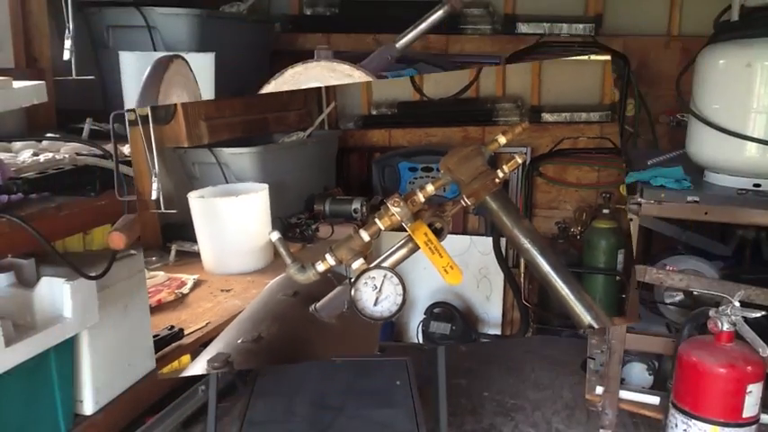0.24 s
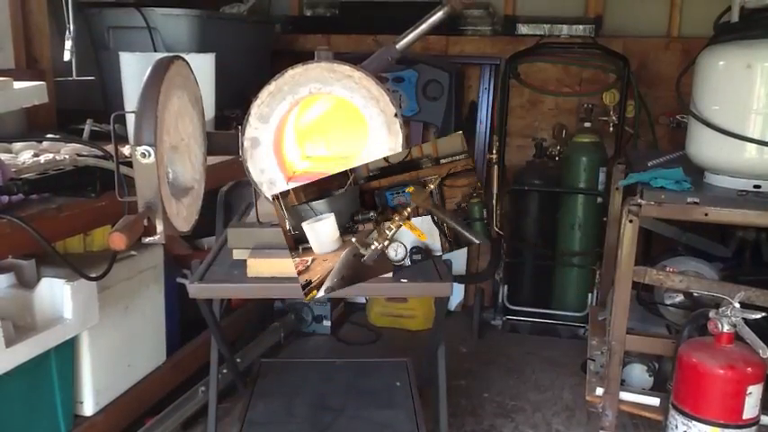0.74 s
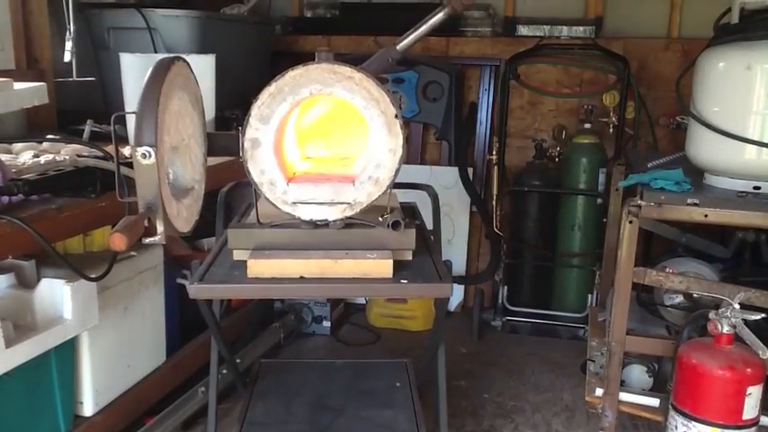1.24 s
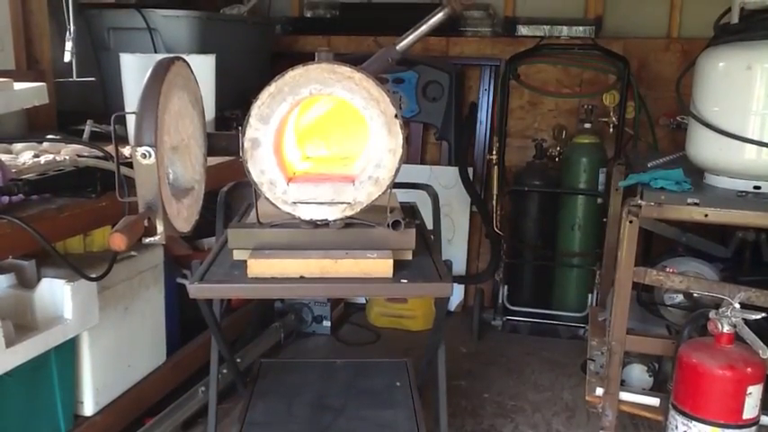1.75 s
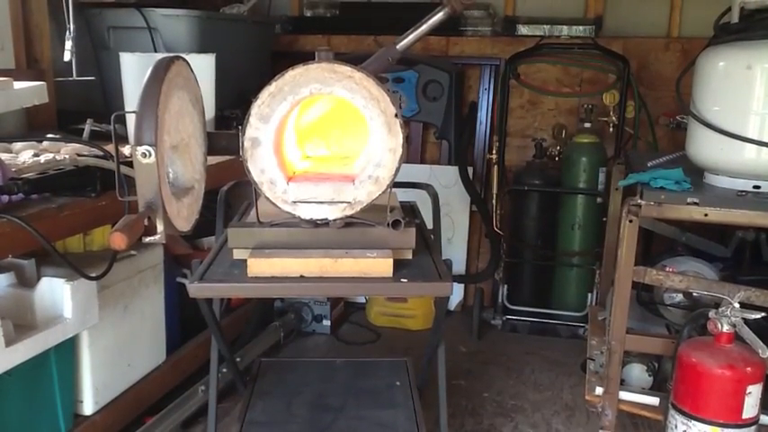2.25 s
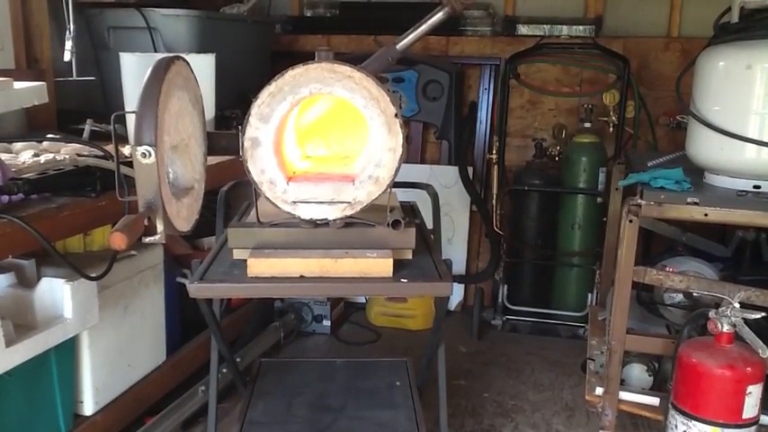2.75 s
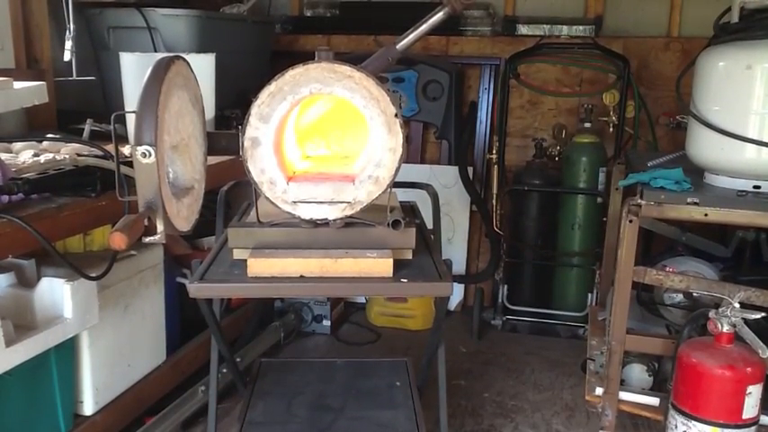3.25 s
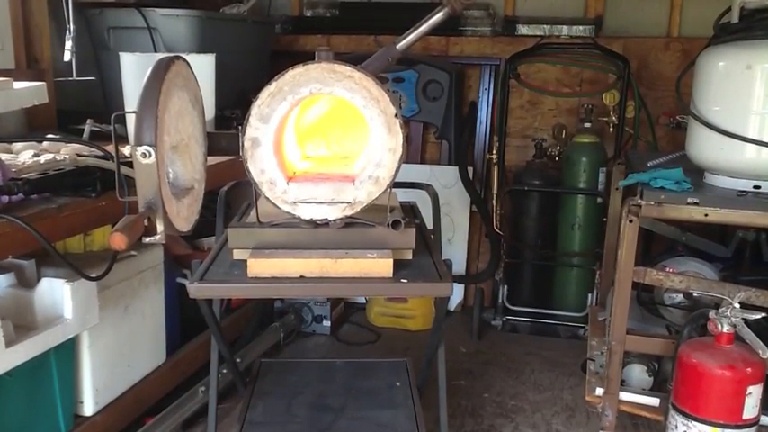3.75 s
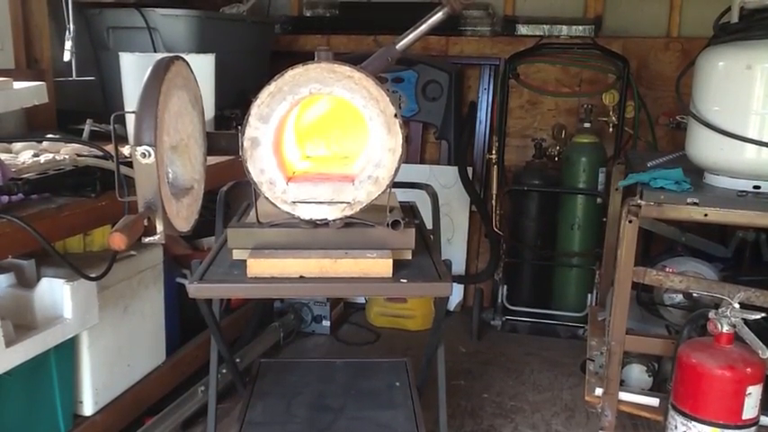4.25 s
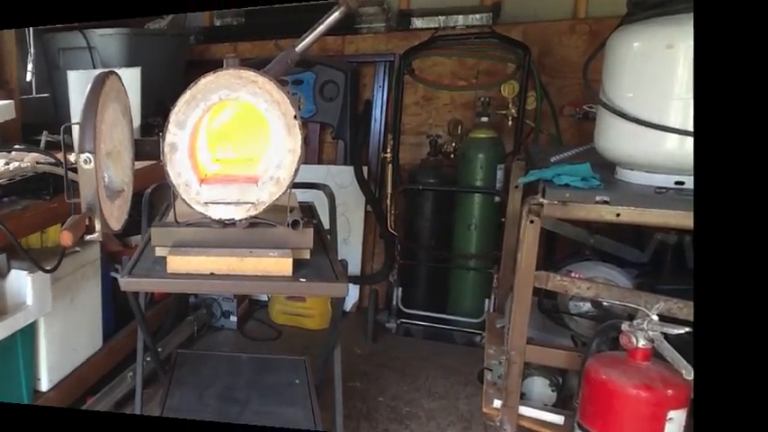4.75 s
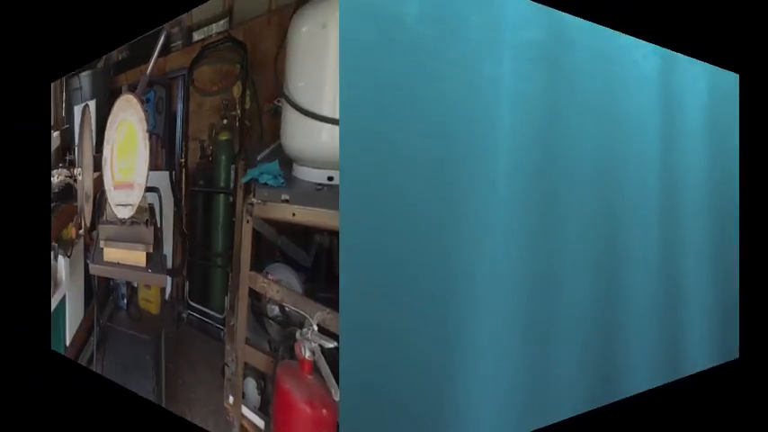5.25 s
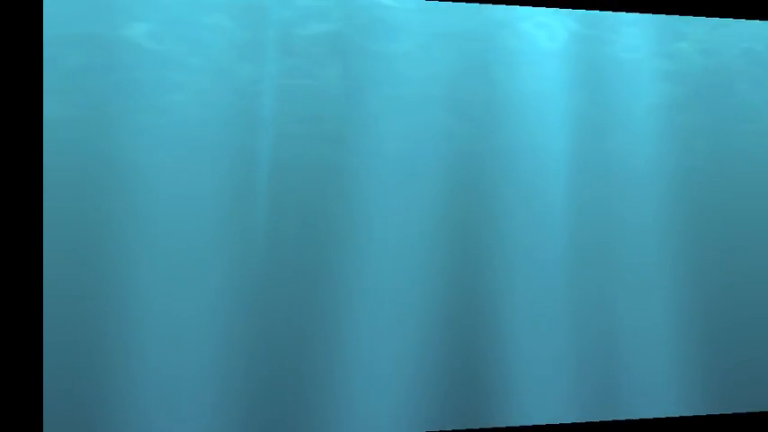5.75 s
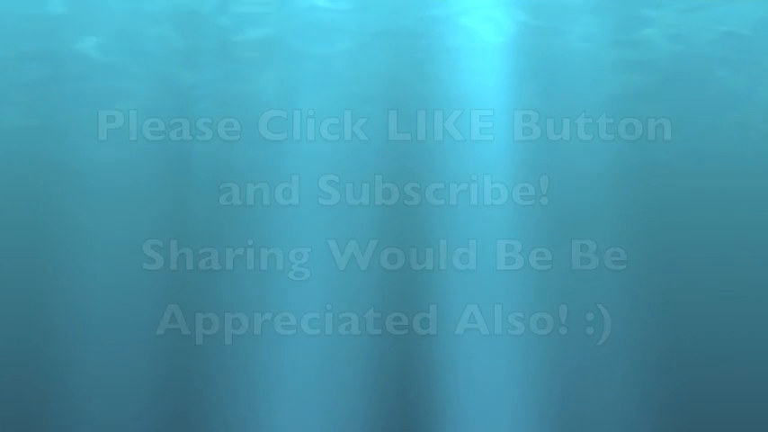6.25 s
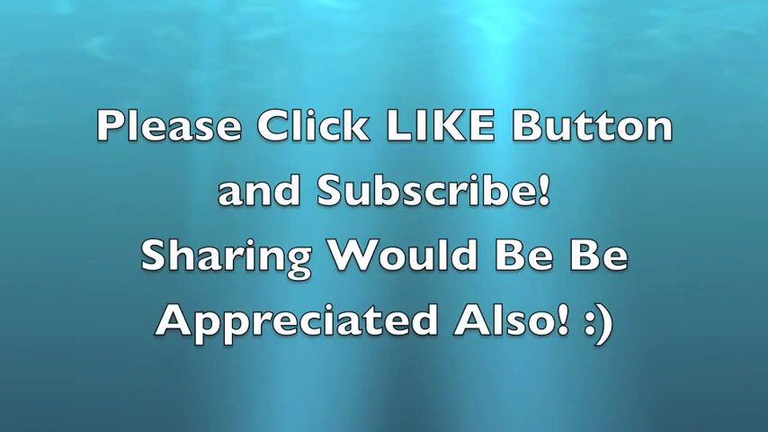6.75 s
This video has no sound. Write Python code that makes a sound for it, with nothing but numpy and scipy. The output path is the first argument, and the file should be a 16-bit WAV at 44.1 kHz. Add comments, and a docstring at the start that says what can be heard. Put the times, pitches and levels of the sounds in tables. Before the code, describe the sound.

Steady forge roar dominated by low and low-mid rushing, coloured by the hollow ring of the chamber and burner tube. Small flame surges ripple through it; faint hiss, high whistles and a few breathy chirps sit far beneath. Soft low booms appear in the second half. The sound rises at the start, stays level, then fades smoothly to nothing in a small, cluttered workshop, heard from nearby.

```python
"""Cluttered workshop: a propane burner roars into an open, glowing forge.
Flame: noise bursts ring chamber and burner-tube resonances; echo nulls hollow out some pitches.
Gas jet: fluttering noise hisses through tube resonances; wavering sines whistle thinly.
Brief whistle flares, breathy chirps and low booms come on top.
The whole sound fades in from a quarter of full gain, holds and fades to silence."""
import sys
import numpy as np
from scipy import signal
from scipy.fft import rfft, irfft, next_fast_len
from scipy.io import wavfile
from scipy.ndimage import uniform_filter1d, map_coordinates

SR = 44100
rng = np.random.default_rng(int(sys.argv[2]) if len(sys.argv) > 2 else 0)


def unload_audio(sound):
    """Save the sound as a 16-bit wav file, at the path given as the first command line argument."""
    columns = np.transpose(np.atleast_2d(sound))
    # keep every value between -1 and 1, then stretch to whole-number steps
    steps = np.round(np.clip(columns, -1, 1) * 32767)
    wavfile.write(sys.argv[1], SR, steps.astype(np.int16))


N = 308680
TIME = np.arange(N) / SR  # s
FREQ = np.maximum(np.arange(N // 2 + 1) * SR / N, 1)  # Hz


def undb(db):
    """Decibels to gain."""
    return 10 ** (np.asarray(db) / 20)


def unit(x):
    """Scale to standard deviation 1."""
    return x / np.std(x)


def slope(points):
    """Broad spectrum in dB, straight on a log-frequency axis."""
    hz, db = np.transpose(points)
    return np.interp(np.log(FREQ), np.log(hz), db)


def bells(table):
    """Resonant lifts or dips in dB; each is half its dB at the edges of its width."""
    return sum(db / (1 + ((FREQ - hz) / (width_hz / 2)) ** 2) for hz, width_hz, db in table)


def ring(x, response_db):
    """Minimum-phase filter: resonances ring after each push; rms 1."""
    cepstrum = irfft(response_db * np.log(10) / 20, N)
    # fold onto positive time to make the filter causal
    cepstrum[1:N // 2] *= 2
    cepstrum[N // 2 + 1:] = 0
    response = np.exp(rfft(cepstrum))
    return unit(irfft(rfft(x) * response, N))


def band(hz, half_width_hz):
    """Noise around one frequency, 6 dB down at the half width; rms 1."""
    size = next_fast_len(N, real=True)
    freq = np.arange(size // 2 + 1) * SR / size
    gain = 1 / (1 + ((freq - hz) / half_width_hz) ** 2)
    noise = rfft(rng.standard_normal(size))
    return unit(irfft(noise * gain, size)[:N])


def walk(rate_hz):
    """Smooth random wandering up to about rate_hz; spread 1."""
    return band(0, rate_hz)


def ramp(start_s, end_s):
    """Straight rise from 0 to 1 between two times."""
    return np.clip((TIME - start_s) / (end_s - start_s), 0, 1)


def swell(centre_s, half_s):
    """Gaussian rise and fall; top 1, half_s is its standard deviation."""
    return np.exp(-.5 * ((TIME - centre_s) / half_s) ** 2)


def curve(points):
    """Control that runs straight between (time_s, value) points."""
    return np.interp(TIME, *np.transpose(points))


def tone(hz, waver_hz, waver_rate_hz):
    """Self-sustained oscillation whose pitch wavers; rms 1."""
    pitch_hz = hz + waver_hz * walk(waver_rate_hz)
    return np.sqrt(2) * np.sin(2 * np.pi * np.cumsum(pitch_hz) / SR)


EVENING, EVENING_S = .45, .06  # share of each swell (in dB) taken back; averaging time


def steady(x):
    """The steady gas supply evens out slow swells and lulls; rms 1."""
    power = uniform_filter1d(x ** 2, int(EVENING_S * SR))
    return unit(x / power ** (EVENING / 2))


# broad colour of combustion noise: pitch_hz, level_db
FLAME_COLOUR = [(30, -58), (60, -57), (78, -34), (100, -19), (150, -8), (230, -4.5), (340, -6), (460, -8.5),
                (660, -18), (780, -27), (1050, -36.5), (1350, -54), (3000, -68.5)]
# resonances of chamber, burner tube and bench: pitch_hz, width_hz, lift_db
CHAMBER_MODES = [(104, 18, 4), (173.2, 28, 5.5), (247.8, 23, 6), (326.4, 20.6, 9), (355.6, 17.2, 7.5),
                 (443, 18, 2.5), (542, 15, 6), (619, 56, 5.5), (671.7, 30, 6), (736, 24, 5),
                 (860.6, 24, 8.5), (1043, 21, 9), (1120, 30, 9.5)]
# floor and wall echoes cancel the direct sound: pitch_hz, width_hz, dip_db
ECHO_NULLS = [(135, 12.6, -7.5), (192.3, 8.5, -19), (380.1, 19.4, -13), (510.6, 29.7, -12.5),
              (591, 7.9, -5), (639.4, 23.2, -14), (729, 25.7, -12)]
# flame surges with a short thud: centre_s, lift_db
FLAME_SURGES = [(.095, 4), (.39, 3), (.82, 4), (1.18, 4), (1.281, 3.5), (1.991, 3), (2.35, 1.5),
                (2.93, 3.5), (3.08, 4.5), (4.07, 5), (4.19, 3), (4.315, 2), (4.665, 2.5), (4.865, 0),
                (5.89, 2)]
# roar below 400 Hz: time_s, gain_db
BODY_GAIN = [(0, 1.4), (1.3, 1.1), (1.9, .3), (2.6, -0.5), (3.1, 0.95), (4.3, 0), (5.3, 1)]
# roar above 400 Hz: time_s, gain_db
UPPER_GAIN = [(0, 1.2), (.3, -0.3), (.7, 1), (1, -0.5), (1.3, 1), (1.9, 2.5), (3.5, 2.5), (4.2, 0.4),
              (4.6, 3), (5.1, 3), (5.4, 0.5), (5.65, 1.8)]
ROAR_DB, SPLIT_HZ, SURGE_HALF_S = -23, 400, 0.0064
SETTLE_FROM_S, SETTLED_S = 1.24, 1.9
EARLY_SHARP, DRIFT, DRIFT_RATE_HZ = .015, .005, 2.5  # first two: shares of resonance pitch


def flame(eddies):
    """Dense bursts of heat release push drifting chamber resonances, now and then surging."""
    bursts = rng.standard_normal(N) * undb(0.79 * walk(91) + 0.2 * eddies)
    roar = ring(bursts, slope(FLAME_COLOUR) + bells(CHAMBER_MODES) + bells(ECHO_NULLS))

    # variable-speed reading: resonances start sharp, settle and keep drifting
    early = EARLY_SHARP * (1 - ramp(SETTLE_FROM_S, SETTLED_S))
    speed = 1 + early + DRIFT * walk(DRIFT_RATE_HZ)
    roar = map_coordinates(roar, [np.cumsum(speed)], mode="wrap")

    surge_db = sum(db * swell(s, SURGE_HALF_S) for s, db in FLAME_SURGES)
    roar = steady(roar * undb(surge_db))

    # small eddies carry the upper part
    highpass = signal.butter(4, SPLIT_HZ, "high", fs=SR, output="sos")
    upper = signal.sosfiltfilt(highpass, roar)
    body = roar - upper
    return (body * undb(curve(BODY_GAIN)) + upper * undb(curve(UPPER_GAIN))) * undb(ROAR_DB)


def workshop(x, t60_s, wet_db):
    """Direct sound plus a short scatter of echoes from shelves and walls; rms 1."""
    echoes = rng.standard_normal(N) * undb(-60 * TIME / t60_s) * (TIME > .003)
    echoes = echoes / np.sqrt(np.sum(echoes ** 2))
    return unit(x + undb(wet_db) * signal.fftconvolve(x, echoes)[:N])


# colour of the gas jet: pitch_hz, level_db
JET_COLOUR = [(500, -11), (1000, 1), (1400, -5), (1900, -2.5), (2250, -3), (2500, -6.5), (2900, -4.5),
              (3700, -9), (4600, -12.5), (5800, -10), (8700, -16.5), (10300, -11.5), (13500, -16),
              (15300, -17)]
# mixing-tube resonances: pitch_hz, width_hz, lift_db
TUBE_MODES = [(1589, 75, 6), (1715, 60, 4), (1930, 110, 5.5), (2180, 74, 5.5), (2390, 45, 3),
              (2694, 70, 4.5), (3230, 52, 5.5), (3844, 160, 7), (4450, 56, 6.5)]
# jet spurts briefly: centre_s, lift_db
JET_SPURTS = [(.74, 1.2), (2.03, 1.5), (2.9, 2.6), (3.45, 2), (3.68, 1.7), (3.95, 1.5), (4.28, 1.5)]
# rush in the tube's lowest resonances: time_s, gain_db
RUSH_GAIN = [(0, -0.5), (1.1, 0.7), (1.8, 1.2), (2.9, 0.9), (3.7, -1), (4.4, -0.1), (6, 0)]
JET_DB, SPURT_HALF_S, RUSH_LOW_HZ, RUSH_HIGH_HZ = -45.5, 0.023, 1500, 2350


def jet(eddies):
    """Gas and entrained air rush down the mixing tube, fluttering and spurting with the flow."""
    spurt_db = sum(db * swell(s, SPURT_HALF_S) for s, db in JET_SPURTS)
    flutter_db = 0.5 * eddies + 0.935 * walk(90)
    flow_noise = rng.standard_normal(N) * undb(flutter_db + spurt_db)
    hiss = ring(flow_noise, slope(JET_COLOUR) + bells(TUBE_MODES))

    bandpass = signal.butter(3, (RUSH_LOW_HZ, RUSH_HIGH_HZ), "band", fs=SR, output="sos")
    rush = signal.sosfiltfilt(bandpass, hiss)
    shaped = hiss - rush + rush * undb(curve(RUSH_GAIN))
    return workshop(shaped, t60_s=0.17, wet_db=-9.5) * undb(JET_DB)


def pulsing(slow_db, quick_db):
    """Whistle level change in dB: comes and goes about four times a second, flickers on top."""
    return slow_db * band(4.6, 2.1) + quick_db * walk(32)


# orifice and mixing-tube whistles: pitch_hz, waver_hz, waver_rate_hz, flicker_db
WHISTLE_TONES = [(6000, 25, 38, 2.2), (9440, 44, 110, 3.5), (8560, 55, 130, 4), (3255, 20, 49, 3),
                 (1938, 45, 70, 4.5)]
# one list per whistle, same order: time_s, level_db
WHISTLE_LEVEL_CURVES = [
    [(0, -62.5), (1.6, -61), (2.05, -57.5), (2.3, -61), (4.4, -59), (6, -60)],
    [(1.2, -70.5), (1.4, -66), (2.2, -69.5), (2.9, -62), (3.4, -71.5)],
    [(3.35, -73.5), (3.5, -70), (3.85, -63), (4.1, -66), (6.1, -70)],
    [(3.1, -75.5), (3.25, -65.5), (3.75, -60), (4.1, -70), (4.8, -70.5), (5, -58), (5.3, -82)],
    [(1.3, -75), (3, -60.5), (4, -58.5), (4.6, -64)],
]


def whistles():
    """Thin tones of orifice and mixing tube waver in pitch, pulse and flicker."""
    out = 0
    for (hz, waver_hz, waver_rate_hz, flicker_db), levels in zip(WHISTLE_TONES, WHISTLE_LEVEL_CURVES):
        level_db = curve(levels) + pulsing(slow_db=1.0, quick_db=flicker_db)
        out = out + tone(hz, waver_hz, waver_rate_hz) * undb(level_db)
    return out


# momentary whistles: centre_s, pitch_hz, level_db
WHISTLE_FLARES = [(.95, 8540, -65), (2.03, 6000, -58), (2.03, 9380, -59), (2.34, 9340, -59.5),
                  (3.46, 8600, -63), (4.72, 8560, -62), (5.42, 8540, -60), (5.86, 8540, -62),
                  (6.04, 8560, -64)]
FLARE_HALF_S, FLARE_WAVER_HZ, FLARE_WAVER_RATE_HZ = 0.034, 36, 130


def flares():
    """An orifice whistle catches, sputters and lets go."""
    out = 0
    for s, hz, db in WHISTLE_FLARES:
        whistle = tone(hz, FLARE_WAVER_HZ, FLARE_WAVER_RATE_HZ)
        out = out + whistle * undb(db + 1.9 * walk(40)) * swell(s, FLARE_HALF_S)
    return out


# breathy chirps, half buried: centre_s, half_s, pitch_hz, width_hz, glide_hz_per_s, level_db
BREATHY_CHIRPS = [(1.329, 0.018, 1120, 170.7, 3506.5, -50), (1.331, .011, 1300, 128.7, 2003, -47.5),
                  (1.583, .018, 866, 150, 0, -44), (1.83, .02, 1840, 500, 0, -50.5),
                  (5.745, .015, 1940, 220, -1, -45.5)]


def chirps():
    """Short smears of narrow-band noise, some sliding upward."""
    out = 0
    for s, half_s, hz, width_hz, glide_hz_per_s, db in BREATHY_CHIRPS:
        pitch_hz = hz + glide_hz_per_s * np.clip(TIME - s, -2 * half_s, 2 * half_s)
        carrier = np.exp(2j * np.pi * np.cumsum(pitch_hz) / SR)
        # analytic noise: the band extends upward from pitch_hz
        smear = (signal.hilbert(walk(width_hz / 2)) * carrier).real
        out = out + smear * undb(db) * swell(s, half_s)
    return out


# momentary low booms: centre_s, half_s, level_db
CHAMBER_BOOMS = [(3.024, 0.022, -27.5), (3.304, 0.019, -25), (3.746, 0.032, -24), (4.48, 0.047, -26.5),
                 (5.13, 0.05, -29), (5.82, 0.029, -27)]
BOOM_HZ, BOOM_WAVER_HZ, BOOM_WAVER_RATE_HZ = 169.5, 2.55, 34.6


def booms():
    """The flame locks onto the chamber's low resonance and sinks back."""
    out = 0
    for s, half_s, db in CHAMBER_BOOMS:
        out = out + tone(BOOM_HZ, BOOM_WAVER_HZ, BOOM_WAVER_RATE_HZ) * undb(db) * swell(s, half_s)
    return out


def scene():
    """Flame and jet share the same large eddies of the gas flow."""
    eddies = walk(5.7)
    burner = flame(eddies) + jet(eddies)
    return (burner + whistles() + flares() + chirps() + booms())[None]


START_GAIN, FULL_S, FADE_OUT_S, SILENT_S = 0.25, 1.37, 4.32, 6.301
TOP_HZ = 15280


def record(dry):
    """Straight fades in and out, then a steep low-pass."""
    fade_in = START_GAIN + (1 - START_GAIN) * ramp(0, FULL_S)
    fade_out = 1 - ramp(FADE_OUT_S, SILENT_S)
    lowpass = signal.ellip(12, .1, 80, TOP_HZ, fs=SR, output="sos")
    return signal.sosfilt(lowpass, dry * (fade_in * fade_out))


dry = scene()
out = record(dry)
unload_audio(out)
```